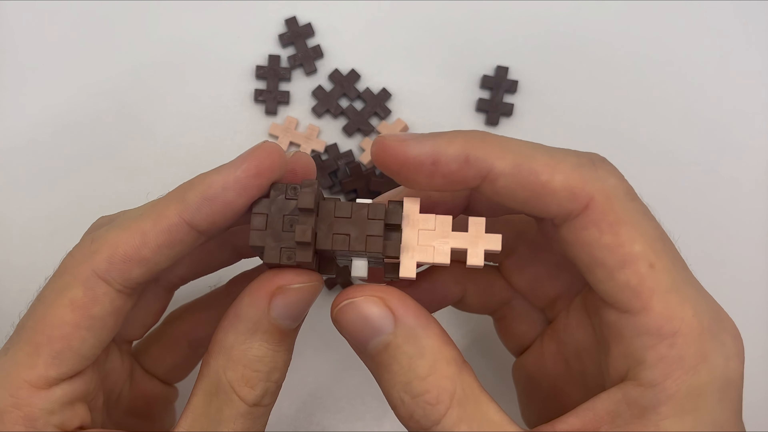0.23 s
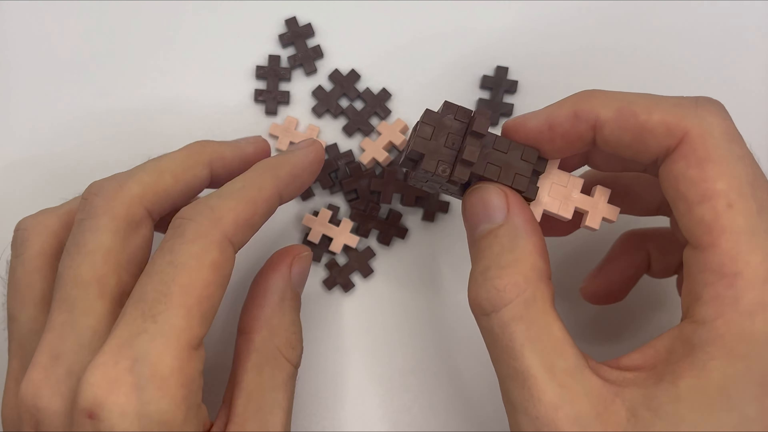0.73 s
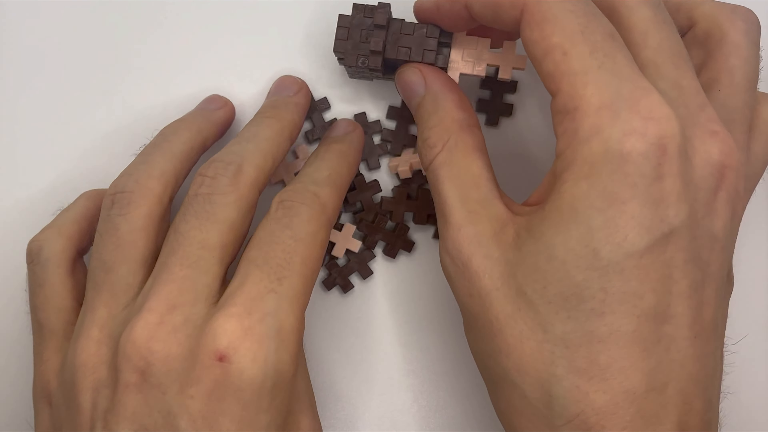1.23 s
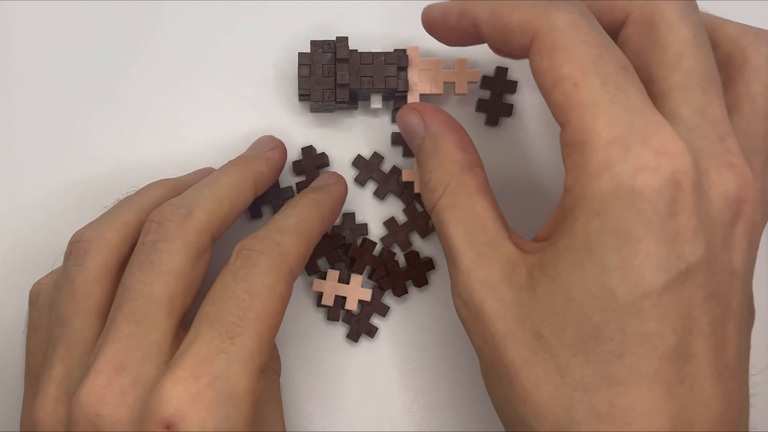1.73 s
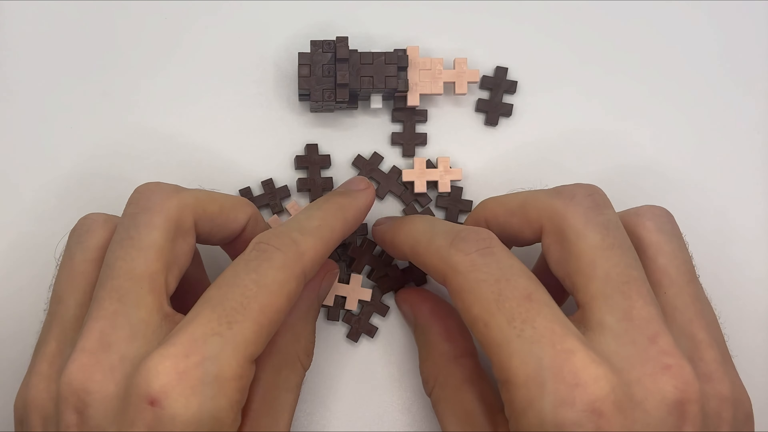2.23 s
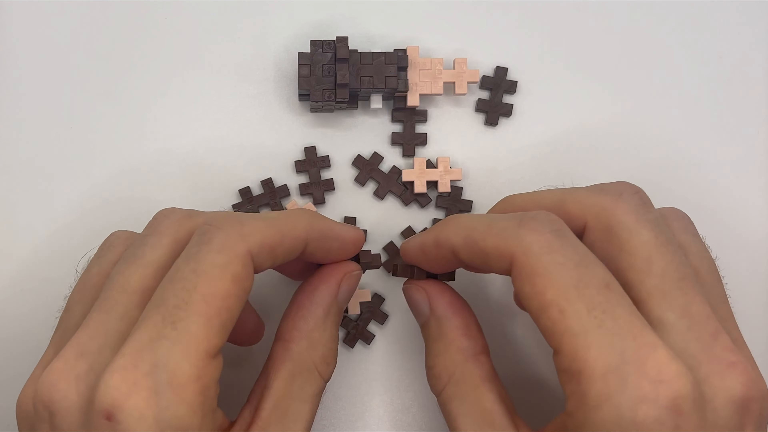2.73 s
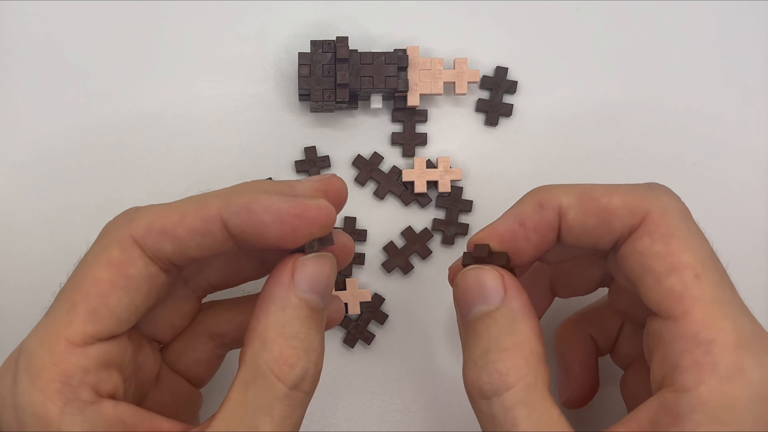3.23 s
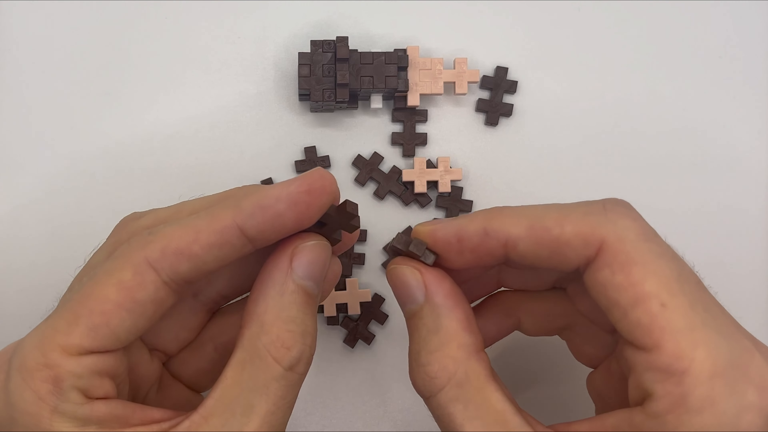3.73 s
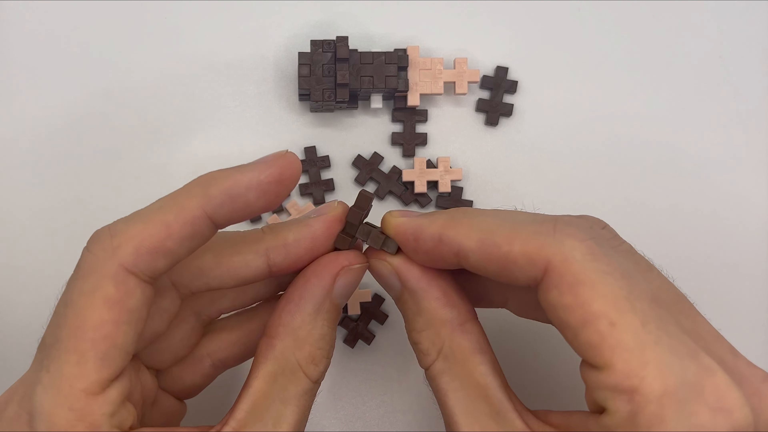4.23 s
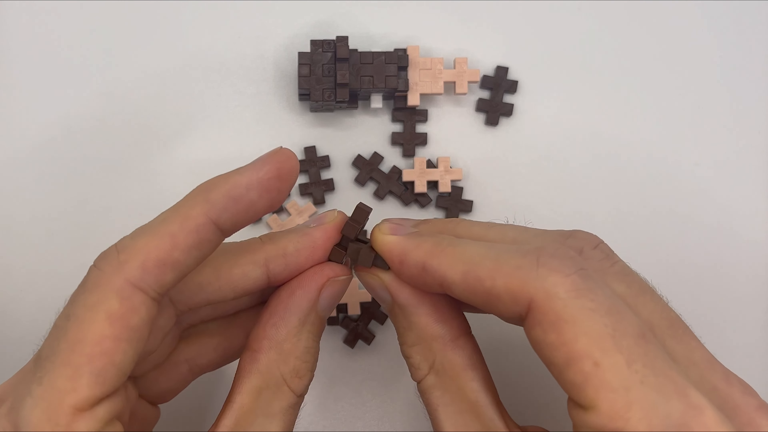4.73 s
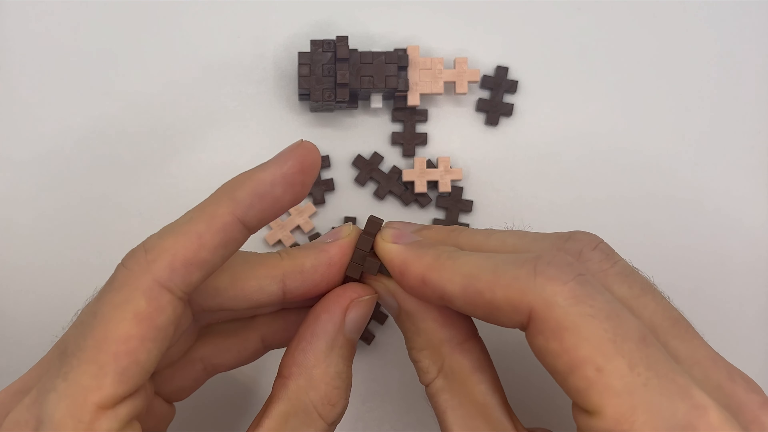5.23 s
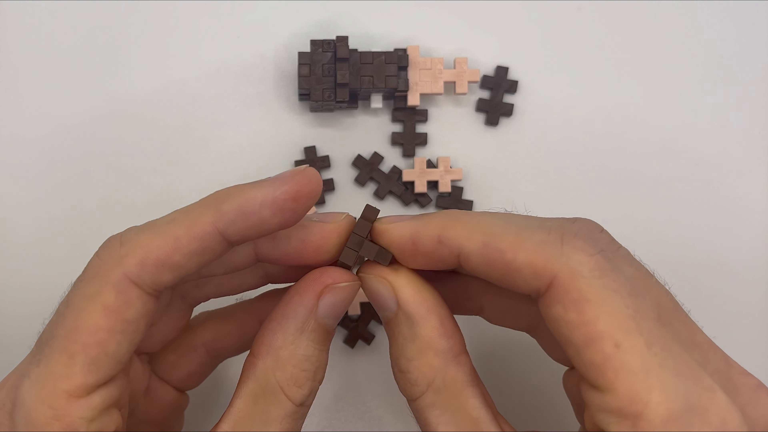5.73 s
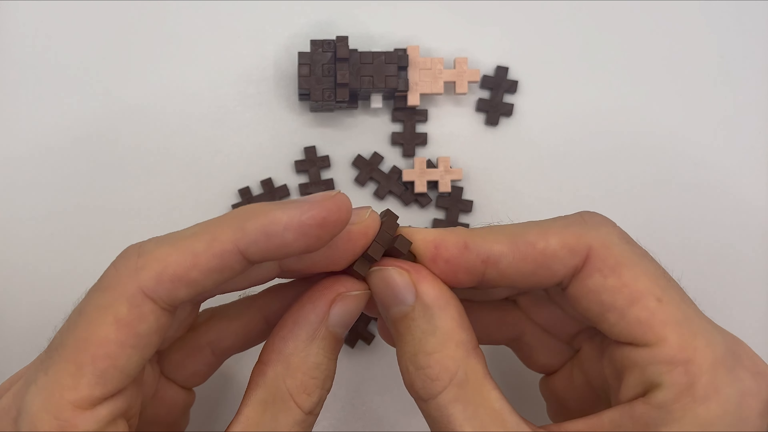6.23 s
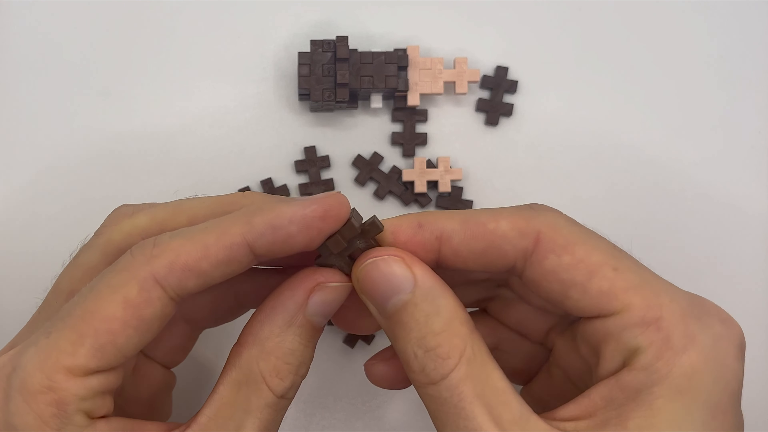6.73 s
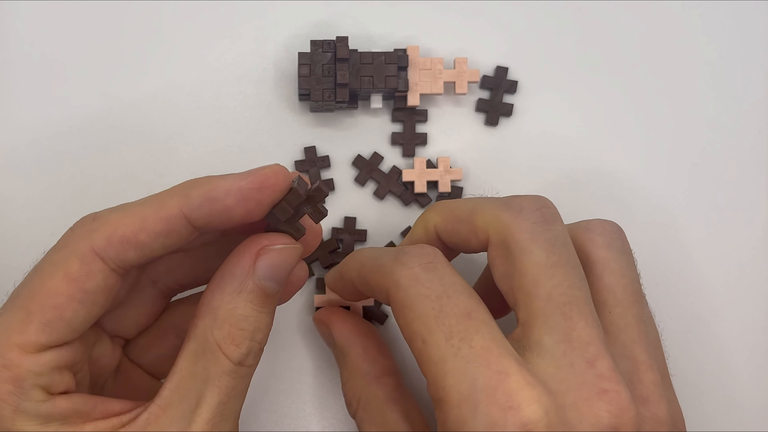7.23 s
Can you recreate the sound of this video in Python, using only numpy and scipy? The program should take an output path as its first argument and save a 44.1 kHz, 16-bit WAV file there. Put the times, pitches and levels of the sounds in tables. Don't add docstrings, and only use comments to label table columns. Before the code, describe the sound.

A quiet room with soft hiss and a faint fan hum, heard close to a hard tabletop. For the first second there is little: a brief weak distant rush and a tiny bump near 0.5 s, then light skin rustle. From about 1.05 to 1.55 s a plastic build drags over the table in a gritty, stuttering scrape full of small catches. It is set down with a thuddy knock at 1.6 s and a louder, harder clack at 1.7 s, with a smaller tap at 1.8 s. Between 2.2 and 2.7 s loose pieces scuff and clatter, with two strong clacks near 2.45 and 2.7 s. Then it is very quiet: sparse, dry ticks of held pieces, a slightly clearer one at 4.95 s, and a firmer snap at 6.47 s with low arm rumble. From 7.2 s light rubs and taps lead to a firm bright knock at 7.4 s.

```python
import sys
import numpy as np
from scipy import signal
from scipy.fft import rfft, irfft
from scipy.io import wavfile
from scipy.ndimage import uniform_filter1d

SR = 44100
rng = np.random.default_rng(int(sys.argv[2]) if len(sys.argv) > 2 else 0)


def log_audio(samples):
    frames = np.atleast_2d(samples).T
    limited = np.clip(frames, -1, 1)
    pcm = np.round(limited * 32767).astype(np.int16)
    wavfile.write(sys.argv[1], SR, pcm)


def volts_from_db(level):
    exponent = np.asarray(level, float) / 20
    return 10 ** exponent


N = 329868

# [f/Hz, level/dB, t60/s]
TOP_MODES = [(695, -9.5, 0.099), (870, -3, 0.21), (1060, 3, 0.033), (1087, -4.5, 0.095), (1470, -5, 0.087),
             (1470, -8, 0.068), (1600, -12.5, .06), (1754, 0.5, 0.088), (1950, -5.5, 0.0697),
             (2263, -19.5, 0.041)]
# [f/Hz, level/dB, t60/s]
UPPER_MODES = [(2345, 2.5, 0.055), (2630, 2, 0.18), (2580, -5.5, .05), (2944, -14, .06), (3234, 4, 0.081),
               (3440, -4.5, 0.11), (3661, -8, .05), (4080, -4, .05), (4640, -11, 0.055)]
# [f/Hz, level/dB, t60/s]
BOARD_MODES = [(105, -2.5, 0.4), (198, -11, 0.098), (249, 4, 0.048), (306, 4, 0.057), (377.1, 3, 0.047),
               (477, -9.5, 0.036), (690, -8, .05)]


def evened(x):
    return x / np.sqrt(np.mean(x ** 2) + 1e-20)


def peaked(x):
    return x / (abs(x).max() + 1e-20)


def add(mix, start_s, sound):
    part = mix[round(start_s * SR):][:len(sound)]
    part += sound[:len(part)]


def coloured(x, points):
    f, db = np.transpose(points)
    hz = np.fft.rfftfreq(len(x), 1 / SR)
    curve_db = np.interp(np.log(hz + 1), np.log(f + 1), db, -120, -120)
    return irfft(rfft(x) * volts_from_db(curve_db), len(x))


def highpassed(x, order, cutoff_hz):
    return signal.lfilter(*signal.butter(order, cutoff_hz / SR * 2, "high"), x)


def resonate(x, hz, width_hz):
    pole = np.exp((2j * np.pi * hz - np.pi * width_hz) / SR)
    return signal.lfilter([1], [1, -pole], x).imag


def steadied(x):
    return evened(x / abs(signal.hilbert(x)) ** .7)


def ring(modes, t, spot_db=0):
    hz, db, t60_s = np.transpose(modes)[:, :, None]
    decay = volts_from_db(db + spot_db - 60 * t / t60_s)
    return (decay * np.sin(2 * np.pi * hz * t)).sum(0)


def near(modes, hz, slope_db):
    return -slope_db * abs(np.log2(np.transpose(modes)[0][:, None] / hz))


def burst(t, x, rise_s, t60_s):
    return x * (1 - np.exp(-t / rise_s)) * volts_from_db(-60 * t / t60_s)


def curve_gain(curves):
    t, out = np.arange(N) / SR, np.zeros(N)
    for curve in curves:
        curve = np.array(curve)
        inside = (t >= curve[0, 0]) & (t < curve[-1, 0])
        fade_in = np.minimum((t[inside] - curve[0, 0]) * 100, 1)
        out[inside] = fade_in * volts_from_db(np.interp(t[inside], curve[:, 0], curve[:, 1]))
    return uniform_filter1d(out, size=150)


def humps(rows, column):
    skew, power = 0.68, 1.6
    out = np.zeros(N)
    for row in rows:
        u = np.arange(0, 1, 1 / (row[1] * SR))
        add(out, row[0], volts_from_db(row[column]) * abs(np.sin(np.pi * u ** skew)) ** power)
    return out


def taps():
    # [t/s, peak level/dB, ring f/Hz, upper ring level/dB, crack level/dB]
    build_taps = [
        (1.315, -20, 1097, -9.5, -20),
        (1.422, -32.5, 1060, -7.5, -25),
        (1.621, -19, 1170, -9.5, -22.5),
        (1.625, -29, 1110, -20, -27.5),
        (1.635, -34.5, 1000, -13, -22.5),
        (1.696, -14, 1500, -9.5, -14),
        (1.958, -52.5, 1060, -35, -25),
    ]
    # [t/s, peak
    # level/dB, ring f/Hz, upper ring level/dB, crack level/dB]
    shared_taps = [(0.477, -58.5, 1400, -10.5, -7), (1.042, -41.5, 1110, -13, -40),
                   (1.109, -33.5, 1600, -20, -36), (1.142, -38.5, 1170, -19, -7),
                   (1.283, -39, 1100, -8, -11), (1.341, -25.5, 1210, -20, -29), (1.656, -50, 1350, -2, -10),
                   (1.785, -21, 1430, -15, -57), (1.806, -30.5, 1410, -25, -37),
                   (1.914, -43.5, 1500, -26, -32), (7.192, -55.5, 1655, 0.5, -40),
                   (7.237, -60.5, 1060, -9, -31), (7.298, -40, 1650, -8.5, -27), (7.39, -48, 980, -7, -29),
                   (7.403, -30, 1300, -13, -28)]
    # [t/s, peak level/dB, ring f/Hz, upper ring level/dB, crack level/dB]
    sort_taps = [(2.227, -54.5, 1120, -14, -34), (2.239, -38, 1064, -32.5, -47),
                 (2.315, -51, 1250, -32, -37.5), (2.328, -33, 1060, -19, -30),
                 (2.348, -34.5, 1130, -21, -34), (2.398, -37, 1160, -13, -36),
                 (2.402, -38.5, 1390, -11.5, -34), (2.43, -58, 1200, -1.5, -17.5),
                 (2.462, -15, 1440, -13.5, -22.5), (2.476, -27.5, 1400, -25, -26.5),
                 (2.52, -40.5, 1136, -10.5, -38), (2.559, -41.5, 1170, -10, -39),
                 (2.59, -41.5, 1020, -26, -26), (2.614, -48, 1080, -17, -32.5),
                 (2.637, -35.5, 970, -9.5, -30.5), (2.685, -31, 1120, -23, -42.5),
                 (2.693, -23.5, 1170, -12, -28.5), (2.696, -18, 1100, -17, -13.5),
                 (2.709, -29.5, 1500, -14, -45.5)]
    # [t/s, peak level/dB, ring f/Hz, upper ring level/dB, crack level/dB]
    pick_taps = [
        (7.201, -42, 1100, -16.5, -39),
        (7.366, -58, 1145, -16, -24.5),
        (7.406, -19, 1150, -5, -13),
        (7.415, -28.5, 1470, -10, -18),
    ]
    spots = (build_taps, 3053), (shared_taps, 2800), (sort_taps, 2540), (pick_taps, 3660)
    rows = sorted((*row, upper_hz) for table, upper_hz in spots for row in table)
    chance = rng.standard_normal((len(rows), 19))
    hiss = rng.standard_normal((len(rows), 8192))
    out = np.zeros(N)
    for row, c, h in zip(rows, chance, hiss):
        add(out, row[0] - .0007, tap(row, c, h))
    return out


def tap(row, chance, hiss):
    # [f/Hz, level/dB per Hz]
    crack_colour = [(2350, -31.5), (4000, -6), (5700, -4), (6150, -10), (6560, -4), (9520, -10.5),
                    (14200, -13), (15300, -23), (16400, -33.5)]
    s, db, hz, upper_db, crack_db, upper_hz = row
    t = np.arange(len(hiss)) / SR
    since_blow = t - .0015
    spot_db = 2.5 * chance[:, None]
    blow = np.exp(-.5 * (since_blow / 0.00027) ** 2)
    chatter = burst(t, hiss ** 3, 0.00014, 0.04)

    top_db = near(TOP_MODES, hz, 4.1) + spot_db[:10] - 1300 * t
    top = signal.oaconvolve(chatter, ring(TOP_MODES, t, top_db))[:len(t)]
    knock = blow * np.cos(2 * np.pi * hz * (1650 / hz) ** 0.1 * since_blow)
    body = peaked(burst(t, np.cos(2 * np.pi * hz * since_blow), .0008, .014))
    low = highpassed(1.1 * knock + .6 * body + 0.78 * peaked(top), 3, 860)

    upper_mode_db = near(UPPER_MODES, upper_hz, 28.0) + spot_db[10:] - 3200 * t
    upper = signal.oaconvolve(chatter, ring(UPPER_MODES, t, upper_mode_db))[:len(t)]
    upper = peaked(1.5 * blow * np.sin(2 * np.pi * upper_hz * t) + peaked(upper))

    grit = coloured(hiss[::-1], crack_colour)
    crack = peaked(burst(t, grit, 0.00097, 0.023) + 0.14 * burst(t, grit, .003, 0.063))
    return volts_from_db(db - 2.5) * (peaked(low) + volts_from_db(upper_db + 7.0) * upper + volts_from_db(crack_db + 5.0) * crack)


def catches():
    # [t/s,
    # peak level/dB, ring f/Hz]
    stud_catches = [(1.068, -42.5, 1680), (1.085, -36, 1240), (1.109, -41, 1060), (1.117, -37.5, 1037),
                    (1.125, -40, 1376), (1.148, -33.5, 1143), (1.154, -31, 1700), (1.162, -36, 1455),
                    (1.174, -34.5, 1080), (1.185, -32.5, 1120), (1.193, -45, 1330), (1.217, -34, 1060),
                    (1.226, -34, 1190), (1.237, -45, 1776), (1.248, -32, 1060), (1.255, -38, 1040),
                    (1.267, -33, 1152), (1.28, -32, 1110), (1.33, -27.5, 1287), (1.345, -33, 1280),
                    (1.36, -41, 1190), (1.379, -40, 1100), (1.4, -36.5, 1164), (1.413, -34, 1075),
                    (1.427, -31.5, 1100), (1.435, -38, 885), (1.444, -39.5, 1760), (1.469, -36.5, 1097),
                    (1.477, -37.5, 816), (1.492, -39.5, 1030), (1.508, -38.5, 1360), (1.521, -39, 1090),
                    (1.528, -40.5, 1423), (1.542, -43, 1110), (1.55, -42.5, 1069), (1.657, -38, 1360),
                    (1.704, -31, 1520), (1.711, -37.5, 1158), (1.819, -41.5, 1360), (1.925, -52, 1710),
                    (2.251, -44.5, 1140), (2.259, -47.5, 1100), (2.276, -49, 996), (2.289, -48, 1090),
                    (2.322, -35.5, 1190), (2.335, -36, 1131), (2.355, -45.5, 1137), (2.364, -46, 1131),
                    (2.417, -48.5, 1203), (2.468, -31.5, 1097), (2.478, -31.5, 1630), (2.702, -28, 1064),
                    (2.717, -41.5, 1084), (7.365, -51, 1170), (7.406, -22.5, 1690)]
    gain_db, rise_s, t60_s, upper_hz, upper_db = -4.5, .0007, .026, 2621, -10
    out, t = np.zeros(N), np.arange(3000) / SR
    upper = peaked(ring(UPPER_MODES, t, near(UPPER_MODES, upper_hz, 14) - 3500 * t))
    for s, db, hz in stud_catches:
        beside = peaked(ring(TOP_MODES, t, near(TOP_MODES, hz, 9) - 1500 * t))
        spot = ring([(hz, 0, t60_s)], t) + .6 * beside + volts_from_db(upper_db) * upper
        add(out, s - .0005, volts_from_db(db + gain_db) * peaked((1 - np.exp(-t / rise_s)) * spot))
    return out


def strokes():
    # [f/Hz, level/dB per Hz]
    grit_colour = [(2060, -30.5), (3500, -2), (4010, -3.5), (4360, -5), (5750, -8), (7540, -6.5),
                   (14800, -24.5), (16400, -36)]
    # [t/s, length/s, level/dB]
    groans = [(1.03, 0.028, -81), (1.11, 0.087, -95), (1.2, 0.072, -65.5), (1.335, 0.06, -52),
              (1.41, 0.06, -55), (1.5, 0.081, -55.5), (1.64, .05, -55.5), (1.785, 0.035, -51.5),
              (2.33, .07, -70), (2.51, 0.0604, -60), (2.42, .04, -62.5), (7.27, 0.16, -67),
              (2.23, 0.11, -65), (7.185, .04, -73.5), (1.745, .04, -66)]
    # [t/s, length/s, level/dB]
    rubs = [
        (7.195, 0.025, -73),
        (7.272, 0.04, -79),
        (7.352, 0.045, -72),
    ]
    rub_hz, rub_width_hz = 3560, 300
    t = np.arange(8192) / SR
    slips = rng.standard_normal((4, N)) * volts_from_db(2.4 * np.minimum(rng.exponential(1, (4, N)), 4))
    slips_per_s = np.array([[5000], [5000], [9000], [1500]])
    slips *= rng.random((4, N)) < slips_per_s / SR

    low = evened(signal.oaconvolve(slips[0], ring(TOP_MODES, t, -250 * t))[:N])
    rough = coloured(slips[0], [(550, -28.0), (850, -5.0), (1100, 14.5), (2100, -4.0), (2800, -20.0)])
    low = highpassed(low + evened(rough), 2, 880)
    light = highpassed(low, 3, 1000)

    upper = evened(signal.oaconvolve(slips[1], ring(UPPER_MODES, t, -250 * t))[:N])
    upper_rough = coloured(slips[0], [(1900, -19.5), (2300, 4.0), (3700, -5), (4600, -19.5)])
    upper += volts_from_db(3.0) * evened(upper_rough)

    grit = coloured(slips[2] + 0.43 * slips[0], grit_colour)
    groan = signal.oaconvolve(slips[3], ring(BOARD_MODES[1:6], t))[:N]
    middle = coloured(slips[1], [(1200, -18), (1550, 0), (2100, -0.5), (2600, -20.5)])
    rub = resonate(resonate(slips[2], rub_hz, rub_width_hz), rub_hz, rub_width_hz)

    slide_gain, scuff_gain = pressure(0, 0)
    layers = [
        (slide_gain, low),
        (scuff_gain, light),
        (sum(pressure(-11.5, 0.93)), upper),
        (sum(pressure(-24, 3.6)), grit),
        (pressure(-13.5, 0)[0] + humps(groans, column=2), groan),
        (pressure(-8, 1)[0], middle),
        (humps(rubs, column=2), rub),
    ]
    grip = uniform_filter1d(uniform_filter1d(abs(slips[3]), size=500), size=500)
    waver = volts_from_db(1.5 * evened(grip - grip.mean()))
    return waver * sum(gain * evened(x) for gain, x in layers) + moans(slips[3])


def pressure(base_db, slope):
    # [t/s, pressure level/dB, speed as brightness/dB]
    slide = [
        (1.031, -63, 0),
        (1.104, -52, 3),
        (1.114, -46, 2),
        (1.17, -44, 2.5),
        (1.26, -45.5, 2),
        (1.36, -49.5, 3),
        (1.44, -48.5, 1.5),
        (1.545, -54, 0.5),
        (1.57, -70.5, -3.5),
    ]
    # [t/s, length/s, level/dB, brightness/dB]
    scuffs = [(1.566, 0.1, -63.5, -3), (1.635, 0.055, -54, -5), (1.76, 0.056, -59.5, 2.5),
              (1.792, 0.073, -55.5, 2), (1.898, 0.13, -76.5, 3.5), (2.223, 0.12, -61.5, 0.5),
              (2.305, 0.1, -55, 0), (2.384, 0.13, -62.5, 1.5), (2.485, 0.17, -63.5, 3),
              (2.631, 0.061, -59, -9.5), (2.708, .03, -67, 3), (2.794, 0.096, -86, 6.5),
              (7.187, 0.046, -63.5, -5), (7.27, 0.041, -71, 2.5), (7.339, 0.069, -66.5, 3.5),
              (7.43, 0.078, -83, 4)]
    slide_rows = [(s, db + base_db + slope * bright) for s, db, bright in slide]
    scuff_rows = [(s, length, db + base_db + slope * bright) for s, length, db, bright in scuffs]
    return curve_gain([slide_rows]), humps(scuff_rows, column=2)


def moans(slips):
    # [t/s, length/s, level/dB, f/Hz]
    hums = [
        (1.405, 0.097, -49, 260),
        (1.338, .03, -57, 368),
        (7.295, 0.06, -69, 293),
    ]
    width_hz = 25
    return sum(humps([row], column=2) * steadied(resonate(slips, row[3], width_hz)) for row in hums)


def thuds():
    # [t/s, peak level/dB, strongest mode f/Hz]
    knocks = [(0.477, -60.5, 99.6), (1.339, -40.5, 116), (1.421, -40, 261), (1.619, -23, 366),
              (1.633, -34, 220), (1.696, -41.5, 385), (1.786, -51, 207), (2.402, -52.5, 105),
              (2.462, -41, 280), (2.697, -48, 294), (6.42, -68.5, 96.9), (7.295, -55, 275),
              (7.403, -37.5, 324), (4.945, -66, 600), (6.467, -78, 603)]
    damping_db_per_s = 250.5
    out, t = np.zeros(N), np.arange(12000) / SR
    mode_hz = np.transpose(BOARD_MODES)[0][:, None]
    late_db = 40 * np.log10(1 - np.exp(-(t + 1e-6) * mode_hz / 0.67))
    for s, db, hz in knocks:
        mode_db = near(BOARD_MODES, hz, 2.9) + late_db - damping_db_per_s * t
        add(out, s + 0.00053, volts_from_db(db) * peaked(ring(BOARD_MODES, t, mode_db)))
    return out


def snaps():
    # [t/s, peak level/dB, ring f/Hz, ring level/dB, low part level/dB]
    ticks = [(3.2726, -71, 2910, -4.5, -12), (3.64, -72.5, 6020, -6.5, -5.5), (4.1543, -69.5, 2650, 2, -21),
             (4.415, -90, 13700, -3, -14), (4.581, -68, 7100, 15, -5), (4.945, -54.5, 2566, -5.5, -10),
             (5.0974, -77, 6930, -4, -4), (4.957, -69, 7970, 4, -11), (5.6905, -61, 6580, -13, -15.5),
             (5.9518, -74, 4050, -12, -0.5), (6.0584, -76.5, 4180, -15.5, 6), (6.1308, -88, 12300, 13, -13),
             (6.1584, -75, 2980, -6, -8), (6.199, -75, 4080, -11, -4.5), (6.4076, -65.5, 6220, -3, -10),
             (6.4662, -43.5, 3190, -32, -10.5), (6.9042, -69, 4220, -13, -5.5)]
    out, t = np.zeros(N), np.arange(4096) / SR
    for (s, db, hz, ring_db, low_db), h in zip(ticks, rng.standard_normal((len(ticks), 4096))):
        edge_db = -17 - 0.98 * (db + 68) + 2.5 * np.log2(hz / 5000)
        wide = coloured(h, [(1800, -32), (2500, 14.5), (5000, 13.5), (8500, 11.0), (11000, 3)])
        tone = resonate(h, hz, 830)
        low = coloured(h, [(200, -14), (450, -13.5), (1200, -8.0), (2500, -21.5), (3500, -24.5)])
        edge = coloured(h, [(7500, 8.5), (9500, 0.0), (15600, 15.0), (16400, -33)])
        dying = [peaked(burst(t, k, 0.00072, 0.026) + 0.08 * burst(t, k, 0.0025, 0.12))
                 for k in (wide, tone, low, edge)]
        gains = volts_from_db([-2.5, ring_db, low_db + 5.0, edge_db + 15.5])
        add(out, s - .0003, volts_from_db(db) * gains @ dying)
    return out


def brush():
    # [t/s, level/dB]
    brushing = [
        [(0.44, -91), (0.528, -76.5), (0.65, -81), (0.79, -81), (0.84, -75.5), (1.1, -75.5)],
        [(2.7, -86), (2.838, -84), (2.972, -81.5), (3.1, -100.5)],
        [(5.4, -89.5), (6.01, -100), (6.3, -97)],
    ]
    # [f/Hz, level/dB per Hz]
    skin = [(590, -8), (1000, 9), (1160, -35.5), (1690, 3.5), (2560, -4), (8450, 1.5), (13800, 0.5),
            (16000, -9)]
    # [f/Hz, width/Hz, level/dB]
    hollows = [(4200, 400, -18), (6300, 350, -13), (8000, 600, -10), (11800, 400, -16)]
    waver = evened(uniform_filter1d(rng.standard_normal(N), size=500))
    grain = rng.standard_normal(N) * volts_from_db(1.2 * waver)
    bands = sum(volts_from_db(db) * evened(resonate(grain, hz, width_hz)) for hz, width_hz, db in hollows)
    return curve_gain(brushing) * (evened(coloured(grain, skin)) + bands)


def lean():
    # [t/s, length/s, sway level/dB, lowest mode level/dB]
    shifts = [(.1, 0.4, -67, -100), (1.02, 0.16, -59, -57), (1.3, 0.24, -67, -59), (1.61, 0.22, -80, -49),
              (1.78, 0.42, -63.5, -86), (2.3, 0.44, -63.5, -61), (2.8, .25, -68, -79),
              (4.94, 0.12, -66, -63.5), (5.03, 0.6, -63, -95), (5.4, 0.42, -64, -86),
              (5.83, 0.81, -60.5, -78), (6.36, 0.32, -51.5, -69.5), (6.5, 0.24, -56.5, -69),
              (6.7, 0.78, -64, -70), (7.33, 0.42, -54, -54)]
    rest_sway_db, rest_mode_db = -72.5, -70
    push = rng.standard_normal((2, N))
    band = [(4, -9.0), (10, 6.0), (20, 2.0), (38, -7.0), (50, -31.5), (70, -59.5)]
    sway = evened(coloured(steadied(coloured(push[0], band)), band))
    mode = steadied(resonate(resonate(push[1], 53, 3.4), 41, 8.2))
    sway_gain = volts_from_db(rest_sway_db) + humps(shifts, column=2)
    mode_gain = volts_from_db(rest_mode_db) + humps(shifts, column=3)
    return sway_gain * sway + mode_gain * mode


def room(x):
    t60_s, echoes_per_s = 0.23, 2500
    t = np.arange(SR // 2) / SR
    signs = rng.choice([-1., 1.], len(t))
    echoes = signs * (rng.random(len(t)) < echoes_per_s / SR) * (t > .004)
    dull = signal.lfilter([.35], [1, -.65], echoes)
    bright = echoes - dull
    tail = dull * volts_from_db(-60 * t / t60_s) + .5 * bright * volts_from_db(-60 * t / (.6 * t60_s))
    return signal.oaconvolve(x, tail / np.linalg.norm(tail))[:N]


def air():
    # [f/Hz, level/dB per Hz]
    tone_colour = [(50, -32), (85, -1.5), (135, -5), (224, -13.5), (261, -0.5), (325, -15.5), (371, -6.5),
                   (406, -16), (528, -14.5), (1270, -19.5), (1450, -19.5), (2630, -26), (14700, -30.5),
                   (16400, -43)]
    # [f/Hz, width/Hz, level/dB]
    fan_lines = [(272.6, 5.6, -86.5), (366, 7.4, -94), (1426, 25, -95)]
    # [t/s, level/dB]
    far = [
        (0.0, -84.5),
        (0.466, -89.5),
        (0.474, -70),
        (0.548, -92),
        (0.8, -91),
    ]
    tone = volts_from_db(-77.5) * evened(coloured(rng.standard_normal(N), tone_colour))
    rush_colour = [(400, -17), (600, 3.5), (750, 2.0), (1000, -0.5), (1500, -11)]
    rush = evened(coloured(rng.standard_normal(N), rush_colour))
    fan = sum(volts_from_db(db) * evened(resonate(rng.standard_normal(N), hz, width_hz))
              for hz, width_hz, db in fan_lines)
    return tone + fan + curve_gain([far]) * rush


def scene():
    close = taps() + catches() + thuds() + snaps() + strokes()
    return (close + volts_from_db(-24) * room(close) + lean() + brush() + air())[None]


def roll_off(x):
    return signal.sosfilt(signal.butter(12, 16520, fs=SR, output="sos"), x)


def record(dry):
    edge = signal.firwin(255, 16300, fs=SR)
    mix = signal.oaconvolve(dry, edge[None], "same")
    return roll_off(mix)


dry = scene()
out = record(dry)
log_audio(out)
```